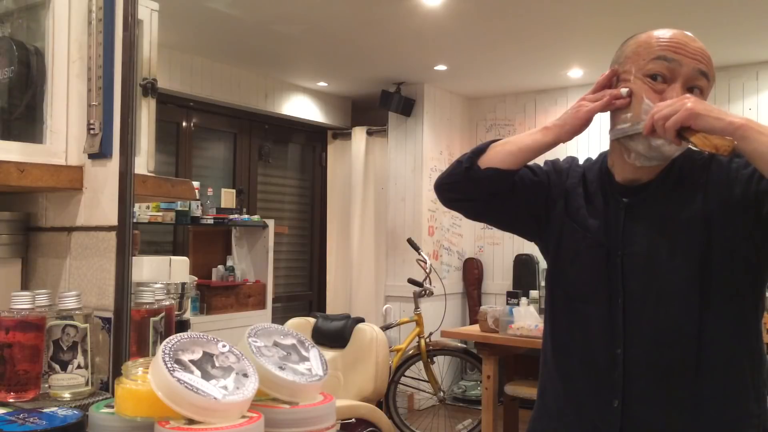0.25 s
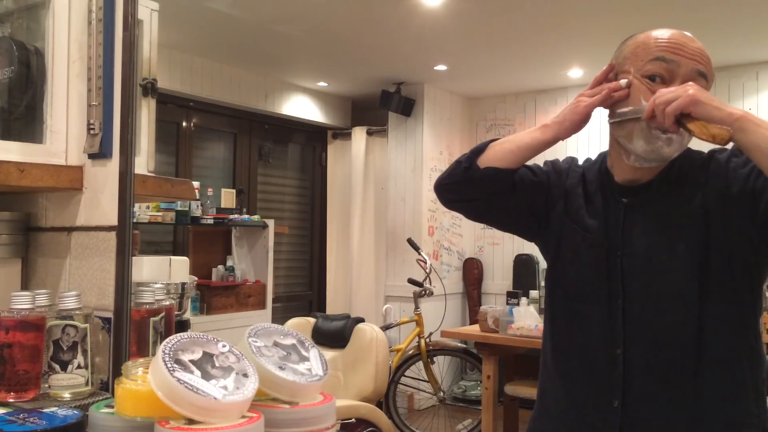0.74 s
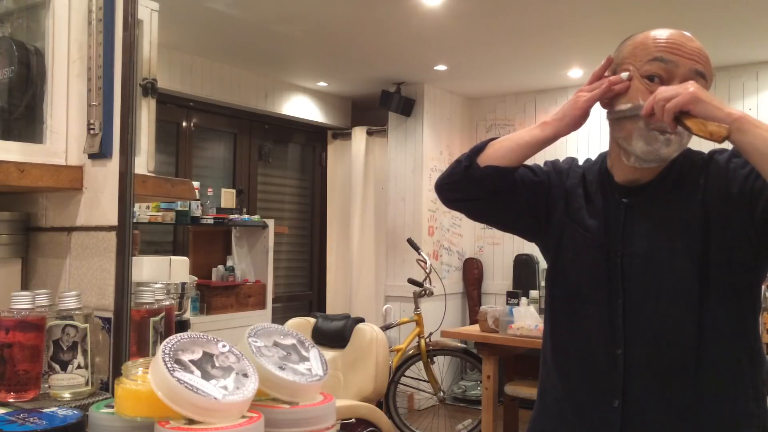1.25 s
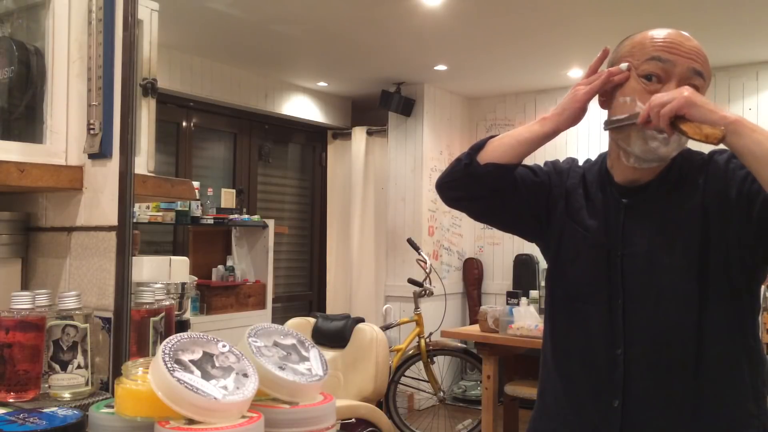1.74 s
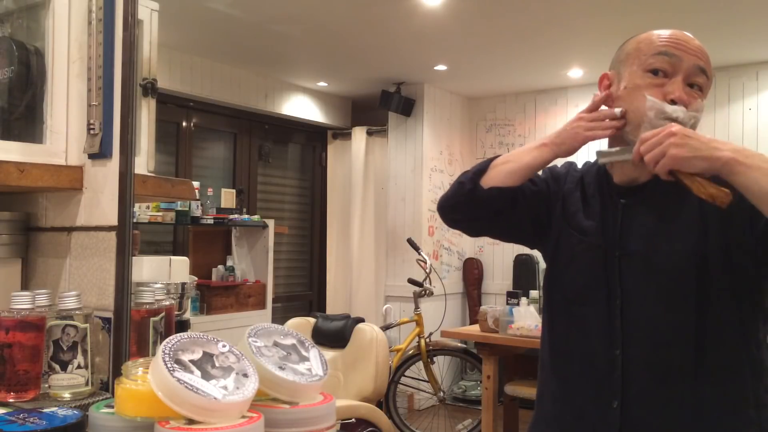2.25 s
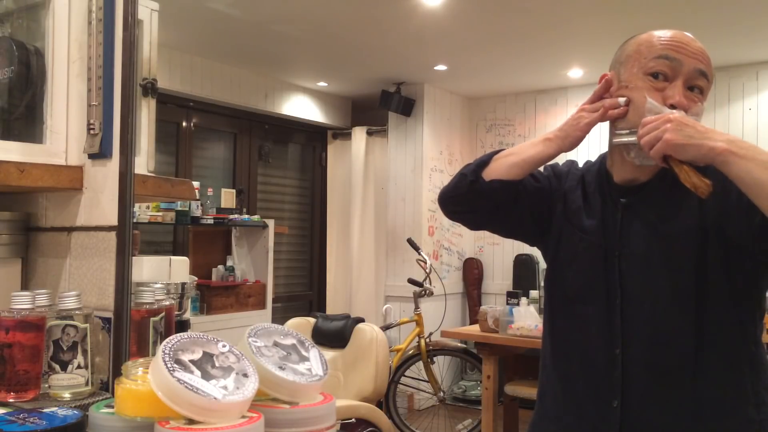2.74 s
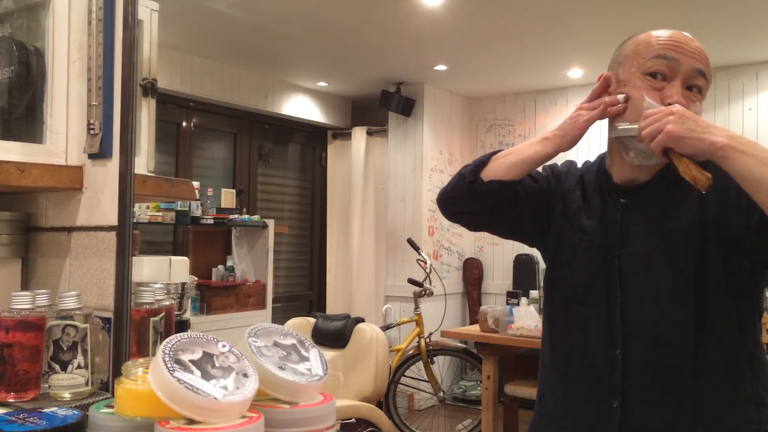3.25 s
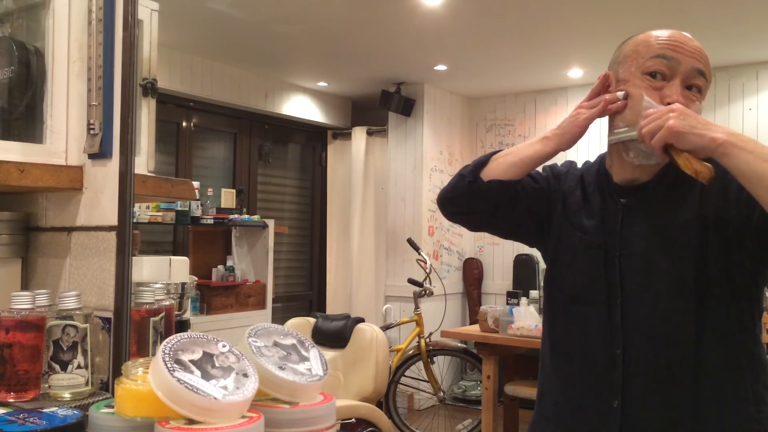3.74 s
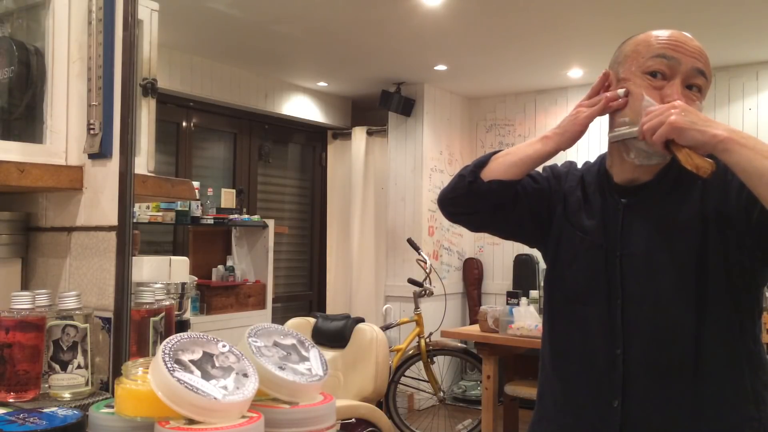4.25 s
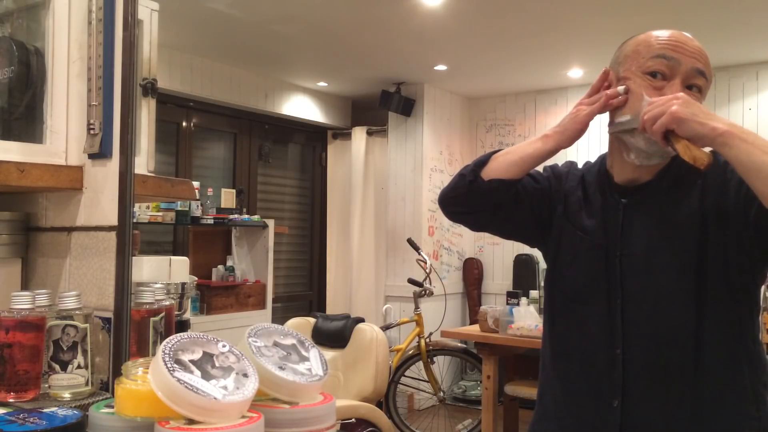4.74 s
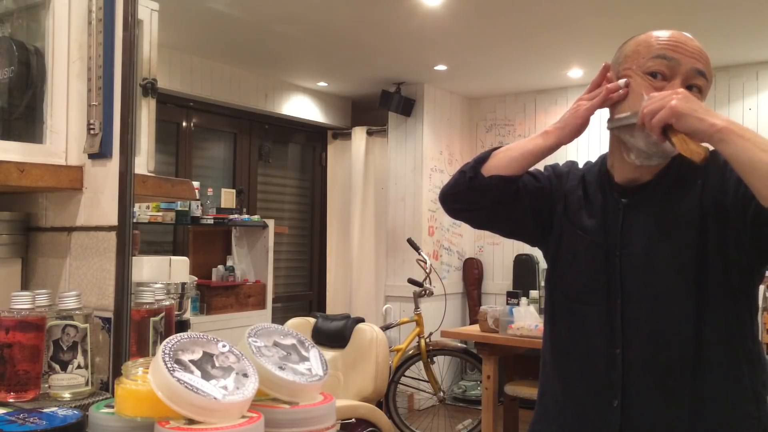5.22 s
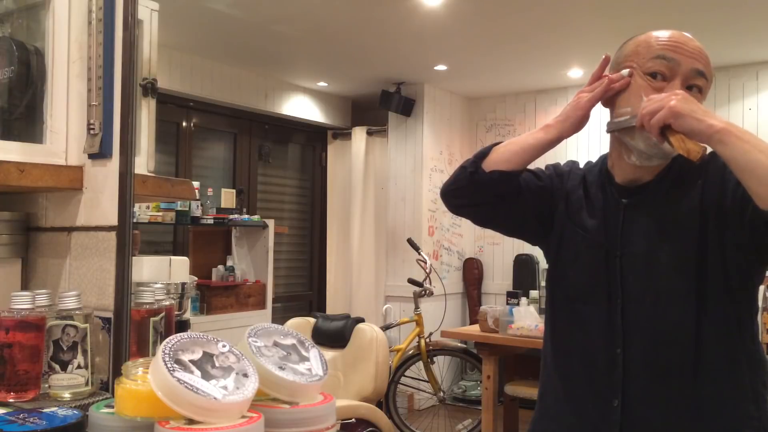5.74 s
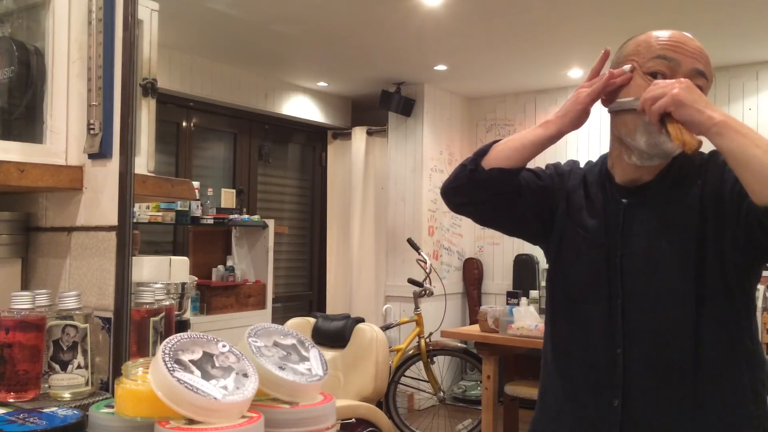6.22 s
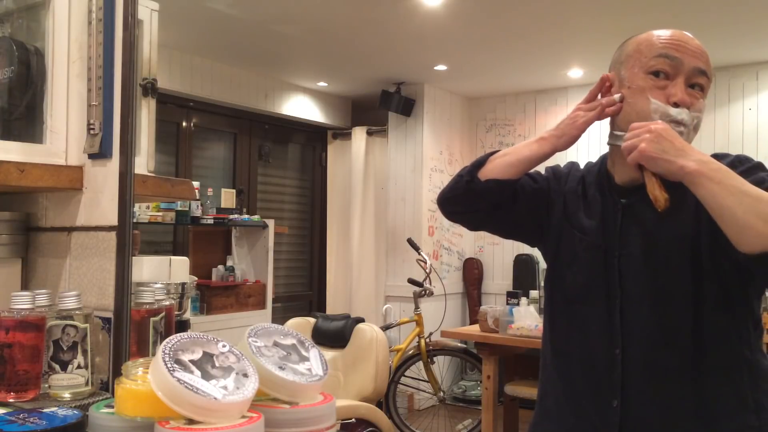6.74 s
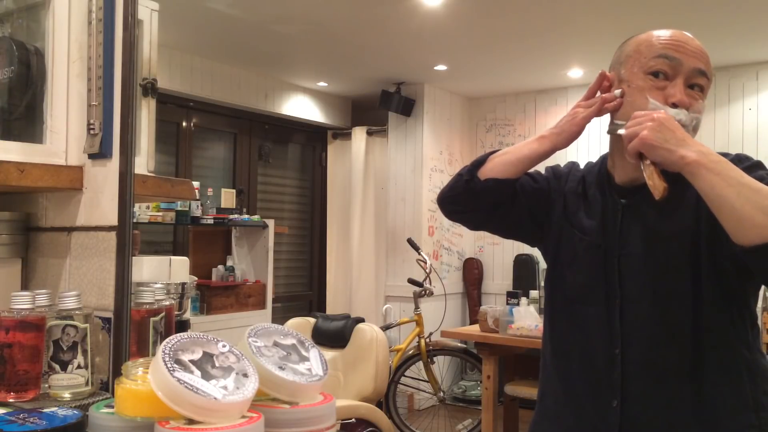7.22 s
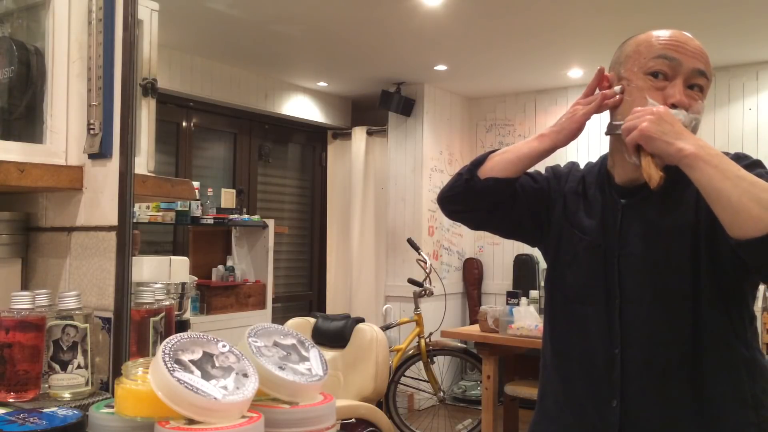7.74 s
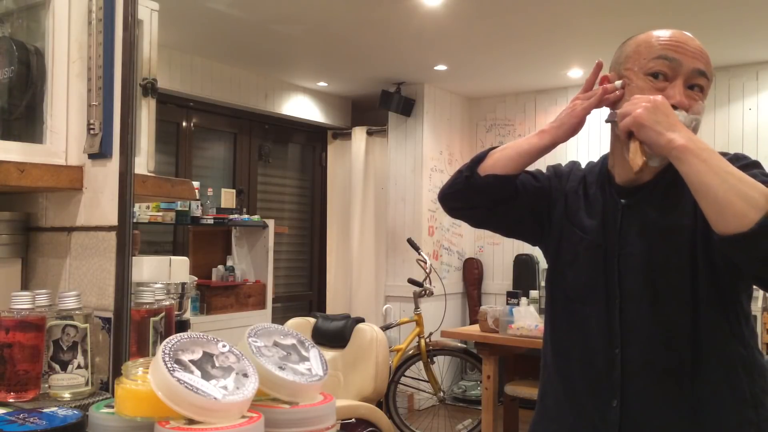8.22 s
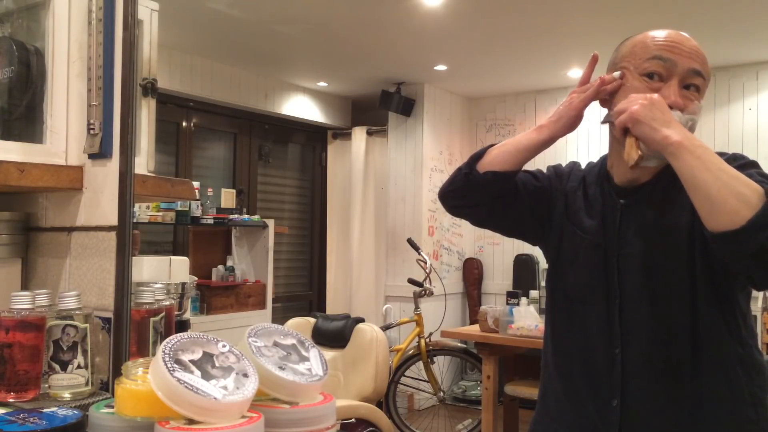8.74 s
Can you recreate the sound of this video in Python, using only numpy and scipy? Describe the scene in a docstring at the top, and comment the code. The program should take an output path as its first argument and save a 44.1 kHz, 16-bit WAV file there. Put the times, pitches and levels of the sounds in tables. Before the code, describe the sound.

Short, dry, bright blade scrapes come in loose rhythm indoors, over a low vehicle rumble and drone that swells early, then sinks away.

```python
"""A straight razor rasps through lathered stubble in short strokes, in a small shop.
Hair snaps are random impulses that excite the thin blade's damped modes; a low ceiling reflects them.
Outside, a heavy vehicle passes and slows, a lighter one behind it: filtered noise swells and fades,
while tones locked to a slowing drive sink through fixed resonances. Steady faint noise lies beneath."""
import sys
import numpy as np
from scipy import signal
from scipy.fft import rfft, irfft
from scipy.io import wavfile
from scipy.ndimage import uniform_filter1d, map_coordinates

SR = 44100
rng = np.random.default_rng(int(sys.argv[2]) if len(sys.argv) > 2 else 0)


def dump_mix(stems):
    """Bounce the given channels to the path in sys.argv[1] as a 16-bit WAV at rate SR."""
    frames = np.atleast_2d(stems).T  # one column per channel
    limited = np.clip(frames, -1, 1)  # hard clip at full scale
    pcm = np.round(limited * 32767).astype(np.int16)
    wavfile.write(sys.argv[1], SR, pcm)


N = 395577
TIME = np.arange(N) / SR  # s
HZ = np.fft.rfftfreq(N, 1 / SR)

# Pulls of the blade: (start [s], length [s], relative level [dB], stubble coarseness [dB],
# point of hardest pressure [share of the length])
STROKES = [(0.11, 0.115, -56.5, -1, 0.52), (0.4, 0.12, -58, 1, 0.36), (0.676, 0.055, -62, 1, 0.41),
           (0.723, 0.075, -62, -3, .35), (1.01, 0.096, -64.5, -2, 0.36), (1.282, 0.094, -69.5, -4, 0.64),
           (1.59, 0.075, -66.5, -5, 0.66), (1.882, 0.12, -64.5, 0, 0.64), (3.004, 0.069, -69, -4, 0.42),
           (3.245, 0.087, -67, -6, .52), (3.513, 0.077, -67, -3, 0.42), (3.811, 0.093, -67, -1, 0.46),
           (4.083, 0.13, -62, 2, 0.51), (4.388, 0.092, -60.5, 0, 0.41), (4.665, 0.1, -61.5, -7, 0.55),
           (4.84, 0.034, -73, -5, .4), (4.948, 0.14, -64.5, -2, 0.3), (5.255, 0.125, -62, -5, 0.35),
           (5.564, 0.12, -61.5, 1, 0.47), (5.846, 0.122, -59, -2, 0.52), (6.161, 0.13, -58.5, 0.5, 0.26),
           (7.269, 0.12, -75, 1, 0.36), (7.615, 0.067, -77.5, 1, 0.47), (7.884, 0.12, -68, 0.5, 0.52),
           (8.202, 0.16, -71, -2, 0.28), (8.51, 0.15, -70, 0.5, .55), (8.699, 0.084, -77, 5.5, .4),
           (8.837, 0.105, -68, -2, .4)]
# Brief changes in the scrape's strength: (time [s], change [dB])
SCRAPE_ACCENTS = [(.181, 5), (.755, 3), (1.045, 3), (1.637, 4), (1.892, 7), (3.043, 5), (3.264, 7),
                  (3.3, 6), (3.56, 5), (4.41, 4), (4.464, 8), (4.671, 9), (4.716, 2), (5.042, 9),
                  (5.061, 4), (5.575, 11.5), (5.588, 6), (5.655, 12), (5.842, 13), (5.945, 4), (6.171, 5),
                  (6.199, -2), (7.905, 0), (8.245, 3), (8.6, 3), (8.87, 0)]
# Spectrum of the hair snaps: (frequency [Hz], relative level [dB])
SNAP_SPECTRUM = [(800, -14), (2200, -11.5), (3300, -3.5), (4400, -12.5), (5500, -4.5), (7000, 1),
                 (8500, -4), (10000, 2.5), (11000, -0.5), (13000, 4), (14000, -1.5), (15200, 3.5)]
# Modes of the blade: (frequency [Hz], width [Hz], relative level [dB], share of the grip level followed)
BLADE_MODES = [(5340, 180, 10.5, 0), (5630, 260, 10.5, 0), (6280, 230, 2, 0), (7030, 330, 8, .7),
               (7320, 175, 15, 1), (9700, 350, -6, 0), (10200, 250, 2.5, 0)]
# Level of the blade's strongest ring as the grip changes: (time [s], level [dB])
GRIP_LEVEL = [(0.5, 0.5), (1.9, 4.5), (3.1, -1.5), (4.7, -3), (5.5, 0.5), (6.2, 2.5), (8, 3.5)]
# Delay of the ceiling reflection as the head moves: (time [s], delay [s])
CEILING_DELAY = [(0.17, .002438), (.75, .002415), (1.94, .002405), (3.3, .00245), (5.0, .002443),
                 (6.2, .002417)]

# Spectrum of the heavy body's rumble: (frequency [Hz], relative level [dB])
RUMBLE_SPECTRUM = [(20.0, -29), (35.0, -15), (55.0, -9), (85.0, -4.5), (110.0, -6.5), (150.0, 2.5),
                   (175.0, -10), (220.0, -2.7), (300.0, -22), (450.0, -21.5), (800.0, -66.5)]
# The rumble briefly surges and dips: (time [s], change [dB])
RUMBLE_SWELLS = [(.12, 2), (.29, 7), (.39, 1.5), (.66, 2), (.82, 3), (.95, 5.5), (1.04, 4), (1.13, -3),
                 (1.24, 5.5), (1.36, 1.5), (1.5, 4.5), (1.585, 4.5), (1.64, -3.5), (1.7, 6.5), (1.8, 3.5),
                 (1.92, 5.5), (2.01, 7), (2.31, 5.5), (2.38, -4), (2.72, 4.5), (2.79, 6.5), (3.18, -19),
                 (3.26, 5), (3.69, 4), (3.78, 3), (4.72, 3)]
# Spectrum of the road roar: (frequency [Hz], relative level [dB])
ROAR_SPECTRUM = [(60.0, -25), (125.0, -6.5), (170.0, -0.5), (210.0, -3.5), (260.0, -6.5), (305.0, -10),
                 (360.0, -4), (460.0, -16), (540.0, -12), (700.0, -16.5), (860.0, -20.5), (1120.0, -20),
                 (1550.0, -25.5), (2350.0, -32.5), (3000.0, -43), (6000, -57)]
# Level of the road roar over both passings: (time [s], relative level [dB])
ROAR_LEVEL = [(0.0, -12), (0.6, -10.5), (1.0, -9), (1.35, -6.5), (2.1, -5.5), (2.6, -6.5), (3.1, -9.5),
              (3.7, -10.5), (4.3, -10.5), (4.9, -12), (5.5, -14.5), (6.3, -18), (7.2, -20.5), (8.1, -25.5),
              (8.97, -30)]
# Colour of the heavy vehicle's roar: (frequency [Hz], width [Hz], gain [dB])
HEAVY_COLOUR = [(506, 99, 2.5), (1140, 600, 1.1)]
# Colour of the lighter vehicle's roar: (frequency [Hz], width [Hz], gain [dB])
LIGHT_COLOUR = [(365, 45, 2), (515, 70, -1.8), (720, 160, 0.56), (1350, 400, 0.78)]
# Spectrum of the wheel hiss: (frequency [Hz], relative level [dB])
HISS_SPECTRUM = [(1000, -1), (2500, 1.5), (4000, 3), (5300, 4), (7000, 1.5), (9000, -4), (11500, -6),
                 (13500, -20), (15000, -28)]
# Level of the wheel hiss: (time [s], relative level [dB])
HISS_LEVEL = [(0, -2), (.6, -2), (1.3, 0.5), (2.2, -1.2), (2.8, -3.5), (3.4, -8.5), (4.5, -10), (6.5, -13),
              (8.97, -21.5)]
# Low resonances of the shop: (frequency [Hz], width [Hz], gain [dB])
SHOP_MODES = [(70.6, 11, 7), (121, 17, 8), (140.4, 11, 2.5), (205, 19, 3), (341.6, 17, 4), (411, 19, 6.5),
              (468.3, 24, 8)]

# Speed of the heavy vehicle's drive, falling unevenly: (time [s], speed [turns/s])
DRIVE_SPEED = [(0, 58), (1, 55.8), (2, 51.8), (2.5, 51.3), (3.2, 48.5), (3.8, 49.7), (4.5, 46.9),
               (5.3, 46.1), (5.9, 43.2), (6.5, 42.9), (7, 41.7), (7.7, 39), (8.4, 39.2), (8.97, 36.9)]
# Load on the drive: (time [s], relative load [dB])
DRIVE_LOAD = [(0.0, 1), (0.9, -1), (1.5, -5.5), (2.1, 1), (2.5, 9), (2.9, -5), (3.7, 2), (4.2, -3.5),
              (4.7, -0.5), (5.0, -2), (5.3, -0.5), (6.35, 1.5), (6.75, -9.5), (7.05, 1.5), (7.7, -3),
              (8.1, -16.5), (8.97, -7)]
# Tones of the drive: (order [cycles/turn], relative level [dB], level gained per load [dB/dB])
DRIVE_ORDERS = [(1.0, -63.5, 0.3), (1.5, -72, 0), (2.0, -61.5, -0.55), (3.0, -66.5, 0.1),
                (4.0, -57.5, 1.26), (5.4, -65.5, 0.8), (6.0, -66.5, -0.0)]
# Resonances that boom as a drive tone slides through: (frequency [Hz], width [Hz], gain [dB])
DRIVE_BOOMS = [(49, 2, 5.5), (59.3, 10.6, 14.5), (80.9, 7.8, 9.5), (90.8, 2.3, 6), (107, 7.5, 15.5),
               (140.6, 4.8, 10.5), (155.18, 3.9, 19), (159.5, 10.7, 8.5), (170.6, 8.8, 7.5), (193, 16, 8),
               (240, 12, 8), (257.6, 13.8, 13)]
# Level of the gear's hum: (time [s], level [dB])
GEAR_LEVEL = [(0, -44), (.3, -50), (.9, -55), (1.5, -51.5), (2.05, -49.5), (2.25, -43), (2.55, -43),
              (2.9, -58), (3.4, -59), (3.75, -51), (4.2, -58), (4.8, -57.5), (5.1, -55.5), (5.5, -60.5),
              (6.0, -56), (6.3, -56), (6.7, -59.5), (7.0, -66.5), (8.97, -76)]

# Spectrum of the room's still air and the microphone's hiss: (frequency [Hz], relative level [dB])
FLOOR_SPECTRUM = [(20.0, -29), (70.0, 0.5), (150.0, -2), (250.0, -18.5), (345.0, -8), (500.0, -20.5),
                  (600, -19.5), (750.0, -24), (1050.0, -26), (1500.0, -30.5), (3000.0, -34.5),
                  (6000, -38.5), (10000, -40.5), (15000, -43.5)]

TOUCH_S = 0.008  # rise to the first bite, and fall on leaving the skin
BITE, HOLD, LEAVE = 0.21, 0.04, 0.08  # shares of full force, of stroke length, of full force
ACCENT_S, RUMBLE_SWELL_S = 0.0057, 0.046  # spread of each brief change
COARSE_BELOW_HZ = 7200  # modes below this respond to coarse hair
ABREAST_S = 1.945  # the heavy vehicle is abreast of the shop
HANDOVER_S, HANDOVER_WIDTH_S = 2.99, 0.44  # the lighter vehicle's roar takes over
GEAR_ORDER = 4.46  # cycles per turn of the drive
SWISH_AT_S, SWISH_S, SWISH_DB = 2.16, 0.07, -66.5
SWISH_HZ, SWISH_WIDTH_HZ = 1980, 1700  # centre, and offset at which the band is 12 dB down
FLOOR_DB = -61
EDGE_HZ = 15330


def razor(hairs_per_s=1900, size_spread_db=4, clump_db=2.0, clump_hz=150, slide_db=-6,
          level_db=-3.5, free_ring=0.46, stiffen_hz_per_db=15):
    """Impulsive excitation of damped modes: clumped hair snaps and sliding noise ring the blade."""
    strength, coarse_db = pressure()
    sizes = gain_of(size_spread_db * np.minimum(rng.exponential(1, N), 3))
    sizes *= rng.choice([-1, 1], N)
    snaps = evened(sizes * (rng.random(N) < hairs_per_s / SR))
    slide = gain_of(slide_db) * rng.standard_normal(N)
    clumps = gain_of(clump_db * drift(clump_hz))
    force = strength * evened((snaps + slide) * clumps)
    coarse_force = force * gain_of(coarse_db)
    fine_force = force * gain_of(-free_ring * coarse_db)  # fine hair damps the upper modes less
    sound = irfft(rfft(force) * gain_of(read(SNAP_SPECTRUM, HZ)), N)

    # a lightly loaded blade rings higher
    shift_hz = -stiffen_hz_per_db * coarse_db + 25 * drift(2.4)
    turn = np.exp(2j * np.pi * np.cumsum(shift_hz) / SR)
    grip_db = follow(GRIP_LEVEL)
    for hz, width, db, share in BLADE_MODES:
        decay = np.exp(-np.pi * width / SR)
        pole = decay * np.exp(2j * np.pi * hz / SR)
        push = coarse_force if hz < COARSE_BELOW_HZ else fine_force
        # filter in the shifted frame, then turn back
        ring = (turn * signal.lfilter([1 - decay], [1, -pole], push / turn + 1e-18)).real
        # a mode answers more or less as the cut moves along the edge
        contact_db = 1.7 * drift(40) + 1.0 * drift(3)
        sound += 2 * gain_of(db - 7.5 + contact_db + share * grip_db) * ring
    return gain_of(level_db) * sound


def pressure():
    """Contact force: each pull bites, presses harder and lifts; also gives the hair's coarseness."""
    strength = np.zeros(N)
    for start, length, db, _, full_at in STROKES:
        corners = start + np.array([-TOUCH_S, 0, full_at * length, (full_at + HOLD) * length,
                                    length, length + TOUCH_S])
        strength += gain_of(db) * np.interp(TIME, corners, [0, BITE, 1, 1, LEAVE, 0])
    start, length, _, stroke_coarse_db, _ = np.transpose(STROKES)
    coarse_db = np.interp(TIME, start + length / 2, stroke_coarse_db)
    return strength * gain_of(swells(SCRAPE_ACCENTS, ACCENT_S)), coarse_db


def shop(x, ceiling_gain=0.48, early_gain=0.2, tail_db=-10, t60_s=0.42):
    """Image sources and diffuse decay: a moving ceiling reflection, four early ones, a short tail."""
    t = np.arange(SR // 2) / SR
    tail = rng.standard_normal(len(t)) * gain_of(-60 * t / t60_s) * (t > .005)
    response = gain_of(tail_db) * tail / np.linalg.norm(tail)
    response[0] = 1  # direct sound
    response[rng.integers(SR // 300, SR // 100, size=4)] += early_gain  # walls and shelves
    ceiling = map_coordinates(x, [(TIME - follow(CEILING_DELAY)) * SR], order=5)
    return signal.fftconvolve(x, response)[:N] + ceiling_gain * ceiling


def rush(rumble_db=-41.0, roar_db=-41.0, hiss_db=-69.0, gust_db=0.57, gust_hz=12,
         judder_db=1.5, judder_hz=22):
    """Broadband radiation of passing vehicles: body rumble, two road roars in turn, and wheel hiss."""
    room_db = peaks(SHOP_MODES, HZ)  # standing waves of the shop
    rumble = steadied(noise(read(RUMBLE_SPECTRUM, HZ) + room_db)) * gain_of(rumble_db)
    rumble *= passing(near_s=1.0, falloff=1.77, lead_s=0.36)
    rumble *= gain_of(swells(RUMBLE_SWELLS, RUMBLE_SWELL_S) + judder_db * drift(judder_hz))

    roar_spectrum = read(ROAR_SPECTRUM, HZ) + room_db
    heavy = noise(roar_spectrum + peaks(HEAVY_COLOUR, HZ))
    light = noise(roar_spectrum + peaks(LIGHT_COLOUR, HZ))
    behind = .5 + .5 * np.tanh((TIME - HANDOVER_S) / HANDOVER_WIDTH_S)
    roar = np.sqrt(1 - behind) * heavy + np.sqrt(behind) * light  # equal-power crossfade
    roar *= gain_of(roar_db + follow(ROAR_LEVEL))

    hiss = noise(read(HISS_SPECTRUM, HZ)) * gain_of(hiss_db + follow(HISS_LEVEL))
    road = mottled(street_bounce(roar + hiss)) * gain_of(gust_db * drift(gust_hz))
    return rumble + road


def passing(near_s, falloff, lead_s=0):
    """Distance law: gain falls as a power of range; near_s is the time to drive the road's distance."""
    return np.hypot(1, (TIME - ABREAST_S + lead_s) / near_s) ** -falloff


def street_bounce(x, share=0.12, lag_s=.0075, near_s=2.38):
    """Comb interference: a reflection across the street lags most when the vehicle is abreast."""
    lag = lag_s / np.hypot(1, (TIME - ABREAST_S) / near_s)
    bounce = map_coordinates(x, [(TIME - lag) * SR], order=3)
    return (x + share * bounce) / np.hypot(1, share)


def swish():
    """Band-limited noise under a Gaussian envelope: a brief swish just after the heavy vehicle passes."""
    band = noise(-12 * ((HZ - SWISH_HZ) / SWISH_WIDTH_HZ) ** 2)
    return band * gain_of(SWISH_DB) * np.exp(-((TIME - SWISH_AT_S) / SWISH_S) ** 2)


def drone(level_db=0.7, waver=0.0027):
    """Order tones: multiples of drive speed vary with load and swell at resonances; a gear hums too."""
    speed, load_db = follow(DRIVE_SPEED), follow(DRIVE_LOAD)
    turns = np.cumsum(speed * (1 + waver * drift(3.83))) / SR
    engine = np.zeros(N)
    for order, db, share in DRIVE_ORDERS:
        order_db = db + share * load_db + peaks(DRIVE_BOOMS, order * speed)
        engine += gain_of(order_db) * tone(turns, order)
    gear = gain_of(follow(GEAR_LEVEL)) * tone(turns, GEAR_ORDER)
    return engine * gain_of(level_db) * passing(near_s=1.23, falloff=1.0) + gear


def tone(turns, order, scatter=.11, scatter_hz=5):
    """Multipath fading: echoes along the street make an order fade and waver, higher orders more."""
    paths = 1 + scatter * order * (drift(scatter_hz) + 1j * drift(scatter_hz))
    return evened((paths * np.exp(2j * np.pi * (order * turns + rng.random()))).real)


def still_room():
    """Stationary background noise: the room's still air and the microphone's hiss."""
    return gain_of(FLOOR_DB) * mottled(noise(read(FLOOR_SPECTRUM, HZ)))


def mottled(x, patch_db=1.5, patch_s=0.051, patch_hz=110):
    """Time-frequency modulation: faint random patches come and go across the spectrum."""
    hz, t, z = signal.stft(x, SR, nperseg=1024, noverlap=768)
    across = np.exp(-(np.arange(-8, 9) * hz[1] / patch_hz * 2) ** 2)
    along = np.exp(-(np.arange(-20, 21) * t[1] / patch_s * 2) ** 2)
    grain = rng.standard_normal(z.shape)
    patches = evened(signal.fftconvolve(grain, np.outer(across, along), "same"))
    z = z * evened(gain_of(patch_db * patches))
    return signal.istft(z, SR, nperseg=1024, noverlap=768)[1][:N]


def steadied(x):
    """Partial compression: divides a noise by a power of its own smoothed energy."""
    power = uniform_filter1d(uniform_filter1d(x ** 2, size=SR // 14), size=SR // 14)
    return evened(x / (power + 1e-9) ** .35)


def noise(shape_db):
    """Spectral shaping: white noise filtered to the given spectrum, at unit rms."""
    return evened(irfft(rfft(rng.standard_normal(N)) * gain_of(shape_db), N))


def drift(rate_hz):
    """Low-pass fluctuation: unit-rms random wavering, rolled off around the given rate."""
    return evened(irfft(rfft(rng.standard_normal(N)) * np.exp(-(HZ / rate_hz) ** 2), N))


def peaks(resonances, hz):
    """Resonance curves: the dB that a set of peaks adds at a frequency."""
    return sum(db / (1 + (2 * (hz - centre) / width) ** 2) for centre, width, db in resonances)


def swells(events, width_s):
    """Gaussian envelopes: the dB by which a sound briefly rises or dips around each event."""
    return sum(db * np.exp(-((TIME - s) / width_s) ** 2) for s, db in events)


def follow(points):
    """Linear interpolation of a table over time."""
    return np.interp(TIME, *np.transpose(points))


def read(points, hz):
    """Spectral interpolation: a spectrum's dB on a log-frequency axis."""
    f, value = np.transpose(points)
    return np.interp(np.log(hz + 1), np.log(f), value)


def gain_of(db):
    """Level law: decibels to amplitude."""
    return 10 ** (np.asarray(db) / 20)


def evened(x):
    """Normalisation to unit rms."""
    return x / np.sqrt(np.mean(x ** 2) + 1e-20)


def scene():
    """Superposition: the shave in front, the traffic behind, over the still room."""
    return (shop(razor()) + rush() + swish() + drone() + still_room())[None]


def record(dry):
    """Band limiting: a soft start and stop, then a linear-phase low-pass."""
    fade = signal.windows.tukey(N, .001)
    low_pass = signal.firwin(1023, EDGE_HZ, window=("kaiser", 9), fs=SR)
    return signal.oaconvolve(dry * fade, low_pass[None], "same")


dry = scene()
out = record(dry)
dump_mix(out)
```